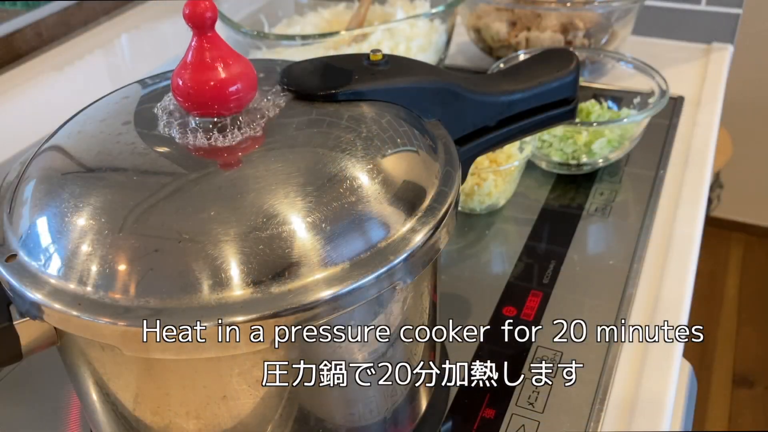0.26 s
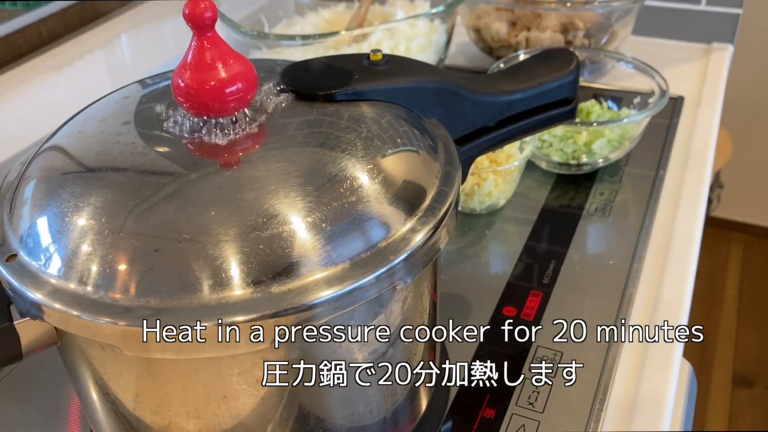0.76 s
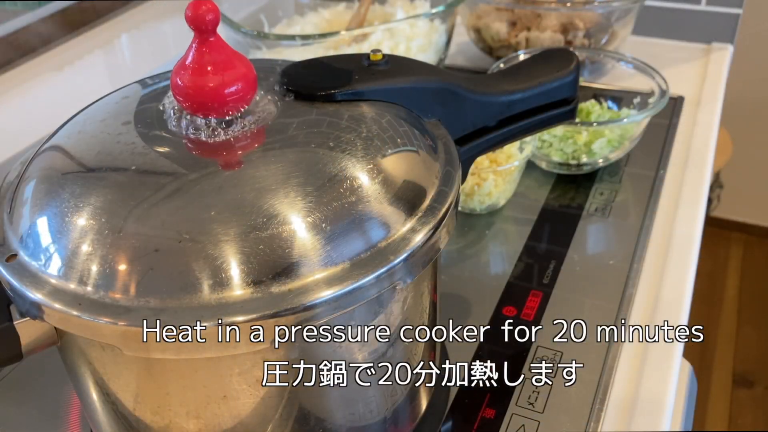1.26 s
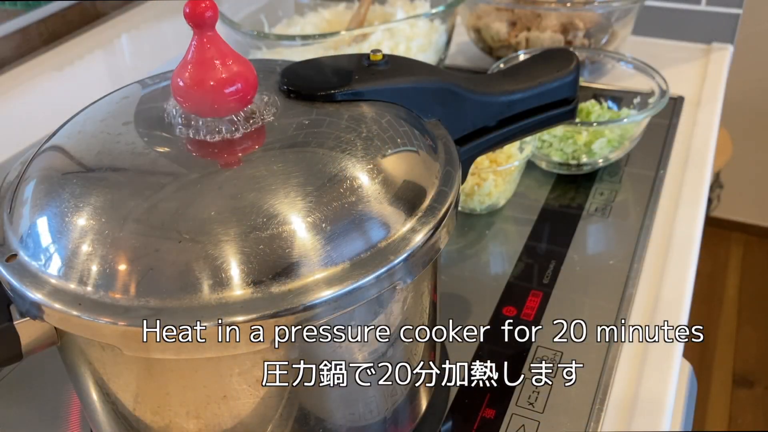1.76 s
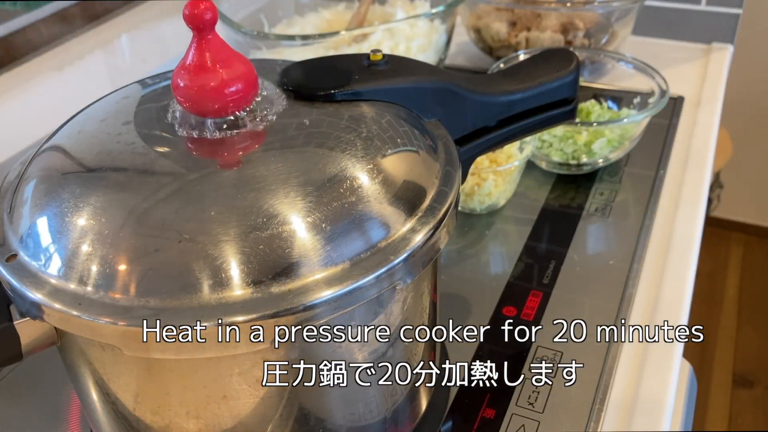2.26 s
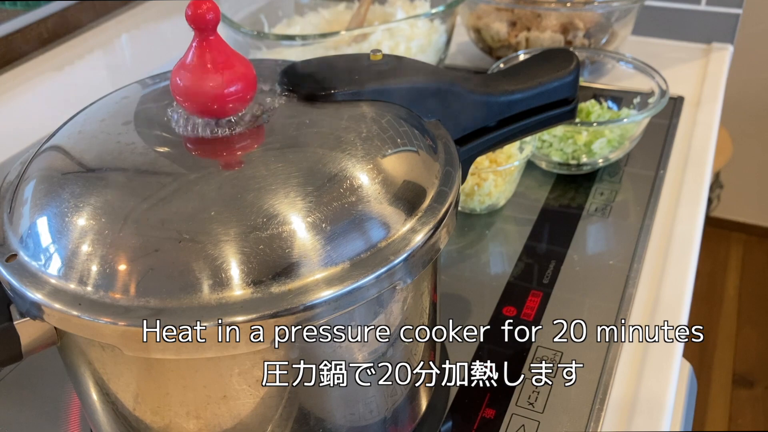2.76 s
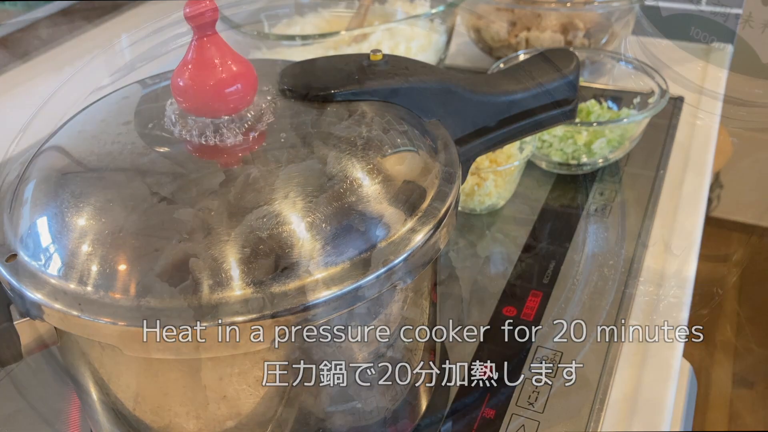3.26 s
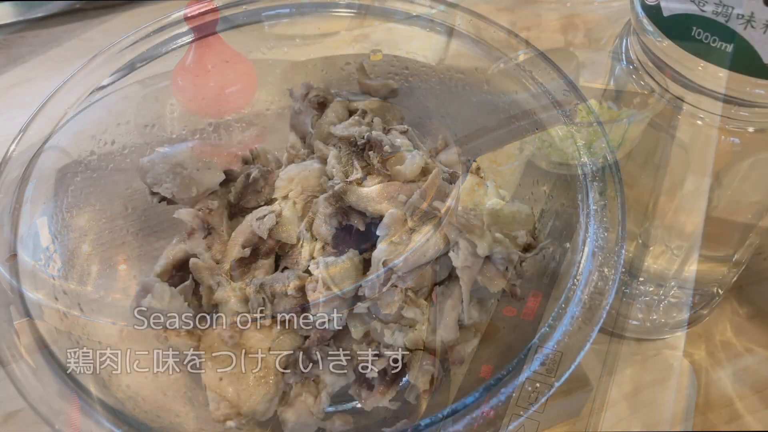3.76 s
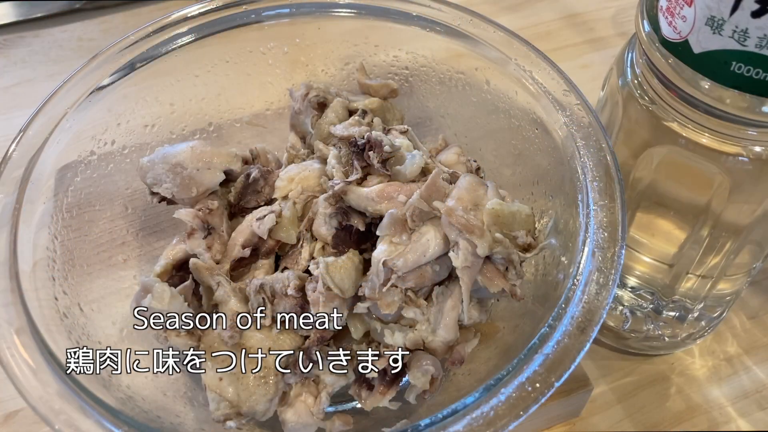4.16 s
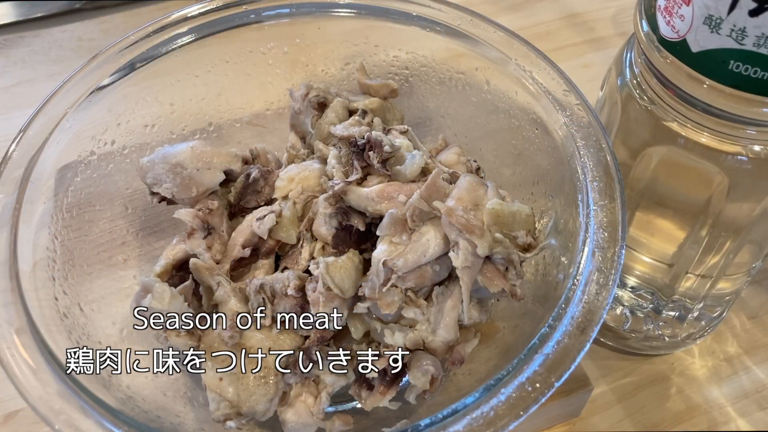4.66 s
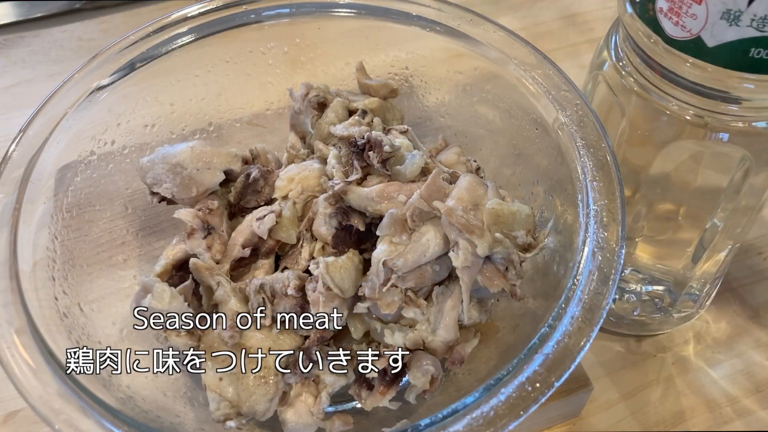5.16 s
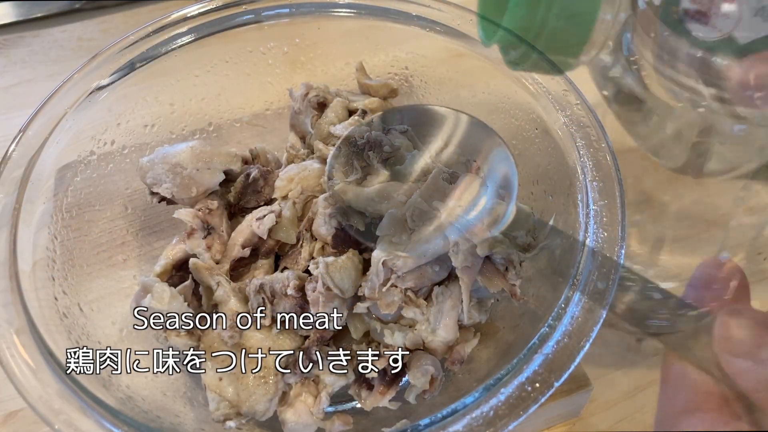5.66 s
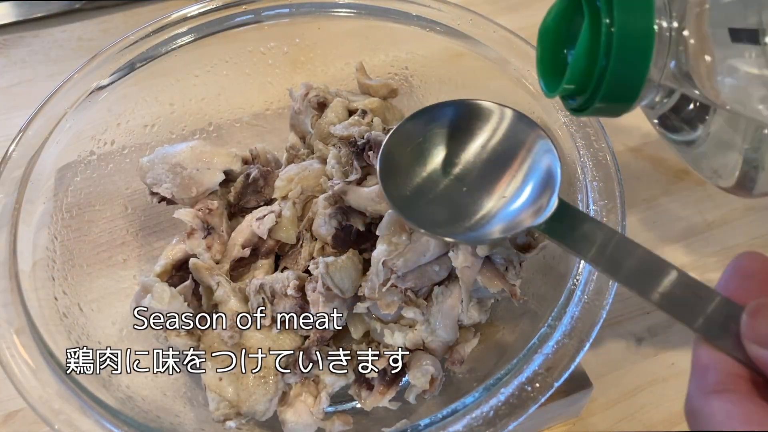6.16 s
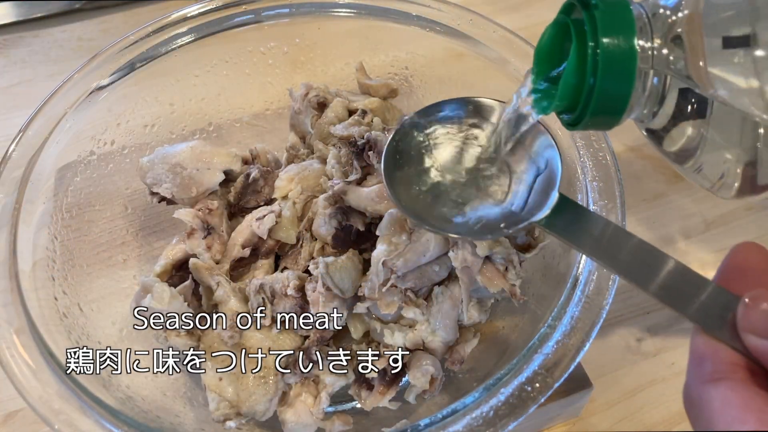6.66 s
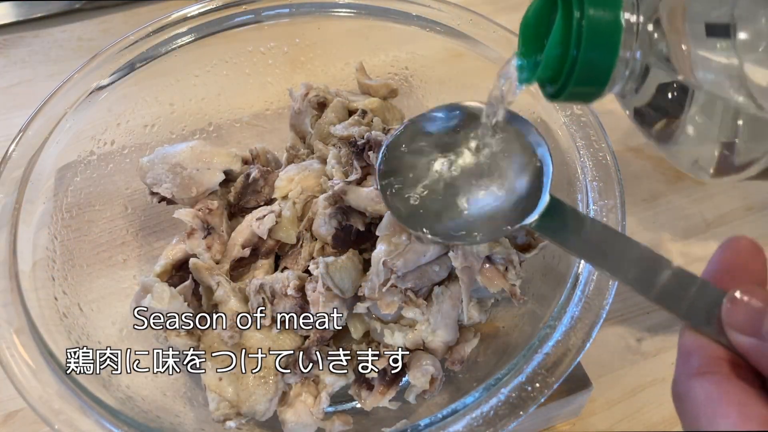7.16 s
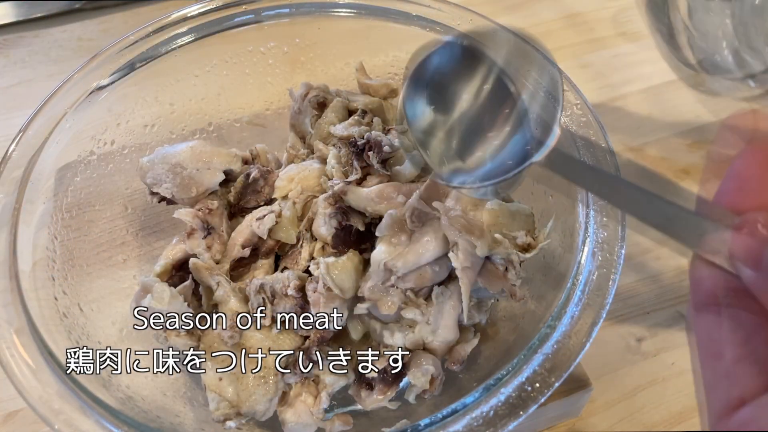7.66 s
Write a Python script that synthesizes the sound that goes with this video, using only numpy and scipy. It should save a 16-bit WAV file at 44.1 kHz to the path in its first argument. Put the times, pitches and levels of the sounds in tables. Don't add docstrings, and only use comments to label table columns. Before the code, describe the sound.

Close phone recording in stereo: rapid irregular steam spurts sputter from a pressure cooker, bright and metallic, over a low fan and fridge hum. After more than three seconds they dissolve into a calmer counter with a stronger hum. One hard plastic crack rings a bottle and thumps the counter, leaving a brief room tail and tiny ticks. Then a soft, bubbly pour ticks and spatters at low level.

```python
import sys
import numpy as np
from scipy import signal
from scipy.fft import rfft, irfft, next_fast_len
from scipy.io import wavfile
from scipy.ndimage import uniform_filter1d

SR = 44100
rng = np.random.default_rng(int(sys.argv[2]) if len(sys.argv) > 2 else 0)


def magnitude_from_level(level_db):
    exponent = np.asarray(level_db, float) / 20
    return 10 ** exponent


def master_out(mix):
    frames = np.transpose(np.atleast_2d(mix))
    ceiling = np.clip(frames, -1, 1)
    pcm = np.round(ceiling * 32767).astype(np.int16)
    wavfile.write(sys.argv[1], SR, pcm)


N = 349272
T = np.arange(N) / SR
SIZE = next_fast_len(N + SR)
HZ = np.maximum(np.arange(SIZE // 2 + 1) * SR / SIZE, 1.)

# [freq_hz, right_lead_rad, diffuse_likeness_0_1]
PORTS = [(20, 0, .55), (60, 0, .65), (120, 0, .9), (300, .05, .8), (600, .6, .3), (1000, 1.8, .45),
         (1400, 1.6, .3), (2400, 1.8, .3), (3000, 2.9, .25), (4200, 3.1, .3), (4900, 3.14, .75),
         (5500, 3.14, .9), (6200, 3.05, .85), (6650, 1.4, .6), (7100, .03, .995), (9600, -.03, .995),
         (10200, -.7, .75), (10800, -2.9, .8), (11500, -3.14, .9)]
# [start_s, end_s]
FADE_S = [3.2, 3.73]


def along(table, column=1):
    rows = np.array(table, float)
    return np.interp(np.log(HZ), np.log(rows[:, 0]), rows[:, column])


def shape(x, gain):
    return irfft(rfft(x, SIZE) * gain, SIZE)[..., :N]


def unit(x):
    return x / np.sqrt(np.mean(x ** 2))


def diffuse():
    alike = np.clip(along(PORTS, column=2), 0, 1)
    common, left, right = rng.standard_normal((3, N))
    return shape(common, np.sqrt(alike)) + shape(np.array([left, right]), np.sqrt(1 - alike))


def walk(rate_hz):
    k = int(SR / rate_hz)
    held = np.repeat(rng.standard_normal(N // k + 1), k)
    return unit(uniform_filter1d(held, k)[:N])


def ring(hz, gain, t60_s, glide=0.):
    t = np.arange(int(t60_s * SR)) / SR
    decay = np.exp(-np.log(1000) * t / t60_s)
    return gain * decay * np.sin(2 * np.pi * hz * t * (1 + glide * t / t60_s))


def add(out, s, piece):
    i = int(s * SR)
    out[i:i + len(piece)] += piece[:N - i]


def bursts(rows):
    out = np.zeros(N)
    for s, db, fall_s in rows:
        add(out, s, magnitude_from_level(db) * np.exp(-np.arange(int(10 * fall_s * SR)) / (fall_s * SR)))
    return out


def vent_opening():
    # [peak_s, jet_db, fall_s, wetness_db]
    puffs = [(0.012, -26, 0.014, 0), (0.08, -27.0, 0.029, 2), (0.157, -29.5, 0.015, 1),
             (0.23, -31.5, 0.024, 1), (0.329, -29, 0.023, 0), (0.405, -35.5, 0.025, 3.5),
             (0.469, -32.5, 0.017, -0.5), (0.631, -33, 0.023, 0), (0.698, -31.5, 0.025, -1.5),
             (0.791, -32, 0.025, -1.5), (1.14, -30.5, 0.024, -3), (1.581, -31.5, 0.049, 0.5),
             (1.648, -36.5, 0.03, 0.5), (1.737, -32.5, 0.03, 1.5), (1.89, -31.5, 0.031, 4),
             (1.906, -33.5, 0.012, 3.5), (1.983, -32, 0.026, 0.5), (2.058, -26, 0.016, -2),
             (2.204, -33.5, 0.02, 0), (2.47, -26, 0.02, -3.5), (2.545, -34, 0.033, 2.5),
             (2.628, -32.5, 0.029, -2.5), (2.782, -28, 0.024, 2.5), (2.859, -24.5, 0.018, -3),
             (2.929, -27.5, 0.026, -2.5), (3.145, -34, 0.026, 1.5), (3.29, -33, 0.022, -1.5)]
    # [peak_s, jet_db, fall_s, wetness_db]
    half_puffs = [(0.538, -34, 0.033, 2), (0.845, -36.5, 0.041, -2.5), (0.934, -41.5, 0.022, -3),
                  (0.983, -34, 0.024, -4), (1.082, -39, 0.029, -1), (1.244, -39, 0.04, -1.5),
                  (1.295, -32.5, 0.019, -4), (1.38, -40, 0.026, -0.5), (1.445, -35, 0.039, -1),
                  (1.552, -38, 0.015, 6), (1.802, -41.0, 0.055, 0), (2.141, -37, 0.033, 5.5),
                  (2.24, -43, 0.042, 0.5), (2.312, -35.5, 0.037, -1.5), (2.379, -37.5, 0.03, 3),
                  (2.691, -36.5, 0.032, -2), (2.998, -38, 0.035, 0.5), (3.086, -36.5, 0.019, 2),
                  (3.224, -36, 0.025, 1), (3.381, -37.5, 0.026, 0.5), (3.444, -33.5, 0.022, -1),
                  (3.521, -36.5, 0.021, -1.5), (3.594, -34.5, 0.022, 1), (3.69, -37.5, 0.021, 2.5),
                  (3.763, -39.0, 0.021, 4), (3.833, -47.5, 0.02, 2.5), (3.886, -54.5, 0.028, 4)]
    # [start_s, peak_db, fall_s]
    spurts = [(0.0498, -23, 0.012), (0.143, -16, 0.012), (0.2034, -34, 0.0071), (0.3202, -22, 0.012),
              (0.4569, -27, 0.014), (0.627, -20, 0.009), (0.6833, -23, 0.012), (0.9652, -29, 0.01),
              (1.1268, -32, 0.012), (1.29, -31, 0.011), (1.5199, -24, 0.012), (1.5427, -19, 0.013),
              (1.706, -20.5, 0.013), (1.9644, -33, 0.012), (2.0438, -28, 0.012), (2.0507, -31, 0.016),
              (2.197, -21.5, 0.013), (2.4616, -12.5, 0.016), (2.6189, -21, 0.012), (2.7531, -35, 0.012),
              (2.7621, -24, 0.012), (2.8419, -26, 0.012), (2.85, -18, 0.011), (2.9068, -13, 0.014),
              (3.0745, -23, 0.012), (3.271, -22, 0.011), (3.505, -26, 0.012), (3.673, -27, 0.013)]
    power = np.zeros((3, N))
    for s, db, fall_s, wet_db in list(puffs) + list(half_puffs):
        near = slice(max(int((s - .15) * SR), 0), int((s + .2) * SR))
        t = T[near] - s
        rise = 0.81 * (t / (1.075 * fall_s)) ** 2
        fall = 0.78 * (np.abs(t) / fall_s) ** 1.42
        bump = np.exp(-np.where(t < 0, rise, fall))
        parts_db = db + np.array([0, -7 + 0.86 * wet_db, -16 + 1.14 * wet_db])
        power[:, near] += (magnitude_from_level(parts_db)[:, None] * bump) ** 2
    leak = magnitude_from_level(-55.5 + np.array([[0], [2.5], [-1.5]])) * np.interp(T, FADE_S, [1, 0])
    spurt = bursts(spurts) * magnitude_from_level(-14 + np.array([[0], [-8], [-18]]))
    return np.sqrt(power + leak ** 2 + spurt ** 2)


def steam():
    # [freq_hz, level_db_per_hz]
    spectrum = [(600, -82.5), (1000, -84), (1500, -83.5), (2000, -82.5), (2400, -79), (3000, -78),
                (4000, -80.5), (5000, -80.5), (6000, -72.5), (7500, -75), (8700, -72), (10000, -75.5),
                (11300, -72.5), (11900, -96.5)]
    # [freq_hz, width_hz, gain_db]
    modes = [(2415, 57, 10), (2580, 78, 2.5), (2874, 50, 10.5), (3490, 20, 10), (3650, 22, 13),
             (4516, 77, 13), (4880, 60, 15.5), (6210, 33, -1), (7400, 120, -2.5)]
    # [freq_hz, left_minus_right_db, left_lead_rad]
    lid_side = [(503, 5.5, -1), (1030, -2.5, -0.5), (1520, -2.5, 3), (2650, -8, 3), (3090, 0, -0.38),
                (4203, 1.5, 2), (4640, 0, 0), (12000, 0, 0)]
    edges_hz = [0, 6600, 7800, 9000, 10200, 23000]
    flutter_db, flutter_hz = 2, 45
    lid = 1 + sum((magnitude_from_level(db) - 1) / (1 + (2 * (HZ - hz) / width_hz) ** 2) for hz, width_hz, db in modes)
    half = np.array([[.5], [-.5]])
    apart = magnitude_from_level(along(lid_side) * half) * np.exp(1j * along(lid_side, column=2) * half)
    colour = magnitude_from_level(along(spectrum)) * lid * apart / (1 + (600 / HZ) ** 3)
    low = 1 / (1 + (HZ / 2200) ** 8)
    high = 1 / (1 + (4500 / HZ) ** 8)
    out = 0
    for gate, band, sputter_db in zip(vent_opening(), (high, 1 - low - high, low), (1.6, 2.6, 2.1)):
        sputter = magnitude_from_level(sputter_db * walk(260) + 0.19 * walk(60))
        steady = shape(diffuse() * sputter, colour * band)
        if band is high:
            steady = sum(shape(steady, (HZ >= lo) & (HZ < hi)) * magnitude_from_level(flutter_db * walk(flutter_hz))
                         for lo, hi in zip(edges_hz, edges_hz[1:]))
        out = out + unit(steady) * gate
    return out


def weight_knocks():
    # [start_s, peak_db]
    knocks = [(0.141, -46), (0.431, -36), (0.768, -43), (1.523, -33.5), (1.967, -35), (2.037, -27),
              (2.127, -28), (2.459, -55), (2.758, -64), (2.921, -33.5), (3.501, -57), (3.672, -42)]
    level = bursts([(s, db - 2.0, .003) for s, db in knocks])
    dull = 1 / (1 + (900 / HZ) ** 4) / (1 + (HZ / 3500) ** 3)
    return unit(shape(diffuse(), dull)) * level * magnitude_from_level([[-2.5], [2.5]])


def cooker():
    return steam() + weight_knocks()


def snap():
    # [start_s, level_db, fall_s]
    strikes = [
        (4.701, -22, 0.005),
        (4.7055, -12, 0.002),
        (4.7085, 3.5, 0.0015),
        (4.71, -7, 0.0014),
        (4.7125, -19, 0.0038),
    ]
    # [start_s, level_db]
    settle = [
        (4.745, -48),
        (4.874, -33.5),
        (5.064, -43),
        (5.145, -47),
        (5.365, -42),
    ]
    # [freq_hz, level_db_per_hz]
    crack_colour = [(60, -68), (200, -31), (600, -51), (1400, -52), (2200, -46), (2800, -38), (3500, -65),
                    (5300, -48.5), (6300, -73), (7800, -54.5), (8800, -67), (10600, -48.5), (11900, -60.5)]
    # [freq_hz, level_db_per_hz]
    tail_colour = [(60, -77), (200, -59.5), (400, -68), (1000, -83.5), (2200, -68), (3500, -74.5),
                   (4400, -74.5), (5300, -78), (6300, -83), (7800, -82.5), (10600, -87.5), (11900, -140.0)]
    # [freq_hz, level_db, t60_s]
    bottle = [(224, -28.5, 0.17), (411, -32.5, 0.2), (726, -29.5, 0.13), (52, -42, 0.34),
              (1000, -24, 0.027), (1400, -14.5, 0.042), (2236, -26, 0.25), (2490, -35, 0.049),
              (2700, -26, 0.1), (2980, -39, 0.17), (4280, -29, .3), (5250, -54, .3), (5260, -39, .3)]
    hits = bursts(strikes + [(s, db, .004) for s, db in settle])
    noise = 0.64 * rng.standard_normal(N) + 0.51 * diffuse()
    crack = shape(noise * hits, magnitude_from_level(along(crack_colour) + 48.5) / (1 + (700 / HZ) ** 3))
    body = np.zeros(N)
    for hz, db, t60_s in bottle:
        add(body, 4.7085 + 0.85 / hz, ring(hz, magnitude_from_level(db), t60_s))
    add(body, 4.7143, -ring(208, magnitude_from_level(-17), 0.054))
    add(body, 4.7455, ring(2260, magnitude_from_level(-31), .06))
    fading = bursts([(4.712, -2, 0.017), (4.712, -6, 0.12)])
    tail = shape(diffuse() * fading * magnitude_from_level(2.6 * walk(60)), magnitude_from_level(along(tail_colour) + 50.5))
    return (crack + body) * magnitude_from_level([[-1.5], [1.5]]) + tail


def pour():
    # [start_s, peak_db, pitch_hz, length_cycles, crack_db]
    drops = [(6.6267, -42.5, 2140, 6.1, -65), (6.8523, -39.5, 5030, 2.8, -69.5),
             (6.9347, -41.5, 4040, 14, -34.5), (7.0066, -40, 8100, 5, -52), (7.108, -49, 2830, 8, -53),
             (7.1966, -46, 5170, 5, -41), (7.2098, -40, 7000, 12, -57), (7.231, -32.5, 2380, 6.8, -28.5),
             (7.2876, -48, 2000, 10, -76), (7.3225, -42, 10000, 8, -65), (7.3376, -53, 5200, 5, -34),
             (7.3417, -35, 8600, 7.7, -36), (7.348, -40, 6000, 9.9, -37), (7.353, -50, 5400, 10, -56),
             (7.386, -36, 5230, 23, -27.5), (7.398, -38, 5400, 11, -46), (7.439, -33, 6270, 8.8, -55),
             (7.473, -37.5, 7140, 14, -52), (7.492, -47, 5100, 9.9, -50), (7.493, -39.5, 2700, 8.4, -55),
             (7.5, -44, 4300, 8.3, -44), (7.527, -43, 8510, 20, -48), (7.563, -36, 10100, 8, -58),
             (7.53, -38, 2530, 4, -56), (7.477, -44, 3230, 8.8, -60), (7.418, -52, 9600, 6, -41),
             (7.752, -47, 7850, 11, -77)]
    # [time_s, level_db]
    trickle = [(6.4, -68), (6.801, -73), (7.2, -65.5), (7.32, -66), (7.35, -64.5), (7.39, -56.5),
               (7.45, -51.5), (7.5, -55.5), (7.54, -63), (7.62, -60.5), (7.92, -89)]
    bubbles = np.zeros(N)
    for s, db, hz, cycles, _ in drops:
        add(bubbles, s, ring(hz, magnitude_from_level(db - 3.5), 7.7 * cycles / hz, glide=0.044))
    cracks = bursts([(s, crack_db - 5.0, .0012) for s, *_, crack_db in drops])
    flow_s, flow_db = np.transpose(trickle)
    for when, pitch, size in rng.random((700, 3)):
        at_s = 6.4 + 1.5 * when
        hz = 1800 * 6.1 ** pitch
        gain = magnitude_from_level(np.interp(at_s, flow_s, flow_db) + 9.7 * size ** 2)
        add(bubbles, at_s, ring(hz, gain, 18 / hz, glide=0.21))
    flow = np.interp(T, flow_s, flow_db, left=-120) + 52.0
    spatter = magnitude_from_level(-50 + 1.1 * flow + 4.0 * walk(150))
    lead_rad = np.interp(HZ, [1490, 2330, 4400, 5100], [-0.5, 4.0, 2.0, 0.5])
    apart = np.exp(1j * lead_rad * np.array([[.5], [-.5]]))
    splash = shape(diffuse() * (cracks + spatter), 1 / (1 + (1200 / HZ) ** 4))
    return shape(bubbles * magnitude_from_level([[-.4], [.4]]), apart) + splash


def room_air(room_db):
    # [freq_hz, level_db_per_hz]
    air = [(25, -96), (50, -77.5), (100, -76), (200, -78.5), (400, -82), (600, -85.5), (1000, -85),
           (1300, -90.5), (2000, -89), (2600, -96), (4000, -100.0), (6000, -105.0), (9000, -105.0),
           (11000, -106.0), (11900, -114.0)]
    # [time_s, level_db]
    hiss_sag = [
        (5.05, 0.5),
        (5.11, -11),
        (5.2, -4),
        (5.23, -0.5),
    ]
    rumble = 1 / (1 + (HZ / 1800) ** 4)
    colour = magnitude_from_level(along(air)) * np.sqrt(SR / 2)
    lows = shape(diffuse(), colour * rumble) * magnitude_from_level(room_db + 51.5 + 0.24 * walk(7.6))
    sag_db = np.interp(T, *np.transpose(hiss_sag))
    hiss = shape(diffuse(), colour * (1 - rumble)) * magnitude_from_level(0.5 * walk(2.2) + sag_db)
    return lows * magnitude_from_level([[.8], [-.8]]) + hiss


def motor_hum(room_db):
    # [start_s, end_s]
    fridge_up_s = [2.66, 3.4]
    # [freq_hz, level_db]
    lines = [(140, -61.5), (222, -61), (360, -67), (441, -65), (478, -67), (600, -67), (721, -64.5),
             (840, -66.5), (958, -68), (1077, -71), (1916, -75)]
    near = np.interp(T, FADE_S, [0, 1])
    throb = np.sin(np.pi * 3.105 * (T - 1.08)) ** 2
    fan_db = -57 - 17 * throb + 0.6 * walk(1.7)
    hum = magnitude_from_level(fan_db) * np.sin(2 * np.pi * 68.6 * T + 0.46 * walk(2.0))
    fridge_db = np.interp(T, fridge_up_s, [-62, -56]) + 0.49 * near * (room_db + 58.5) + 1.0 * walk(7)
    hum += magnitude_from_level(fridge_db) * np.sin(2 * np.pi * 120.2 * T + 0.16 * walk(4.2))
    hob_db = -65.5 - 1.9 * near + 1.2 * walk(2.37)
    hum += magnitude_from_level(hob_db) * np.sin(2 * np.pi * 205 * T + 0.35 * walk(7.6))
    for hz, db in lines:
        hum += near ** 2 * magnitude_from_level(db + 2.2 * walk(8)) * np.sin(2 * np.pi * hz * T + hz / 1800 * walk(12))
    return hum * magnitude_from_level([[.6], [-.6]])


def kitchen():
    # [time_s, level_db]
    room = [(0, -54), (.3, -57.5), (1.7, -56), (2.5, -53.5), (3.5, -55), (3.95, -50), (4.6, -49.5),
            (4.9, -50), (5.2, -48), (5.55, -53.5), (6.1, -49.5), (7.3, -51), (7.48, -50), (7.92, -54.5)]
    room_db = np.interp(T, *np.transpose(room))
    return room_air(room_db) + motor_hum(room_db)


def scene():
    return cooker() + snap() + pour() + kitchen()


def thin(x):
    # [freq_hz, level_db]
    mask = [(1000, -18), (2400, -8), (3600, -5), (4500, -8), (4950, -2), (5400, -2), (5900, -6),
            (6600, -3.5), (7200, -9), (9300, -9), (10200, -3), (11000, -1), (11700, 1)]
    sharp_s = [.02, .14, .185, .205, .254, .67, .764, 2.04, 2.065, 2.135, 2.3, 2.76, 2.83, 3.06, 3.13, 3.34,
               3.365, 3.665, 3.715, 4.71, 4.735, 5.22, 6.94, 7.01, 7.1, 7.125, 7.2, 7.225, 7.335, 7.36,
               7.39, 7.41, 7.495, 7.52, 7.545, 7.91]
    band_bins, lead = 10, 94
    window = signal.windows.kaiser_bessel_derived(2048, 4 * np.pi)
    mid_side = np.pad(np.array([x[0] + x[1], x[0] - x[1]]) / 2, ((0, 0), (lead, 0)))
    hz, _, z = signal.stft(mid_side, SR, window, nperseg=2048)
    power = np.add.reduceat(np.abs(z) ** 2, np.arange(0, len(hz), band_bins), axis=1)
    sharp = np.isin(np.arange(z.shape[2]), np.round((np.array(sharp_s) * SR + lead) / 1024))
    waver = uniform_filter1d(rng.standard_normal(power.shape), size=2, axis=2)
    waver = np.sqrt(6) * uniform_filter1d(waver, size=3, axis=1)
    mask_db = np.interp(hz[::band_bins], *np.transpose(mask))[:, None] - 22 * sharp + 4.5 * waver
    kept = power > power.sum(0) * magnitude_from_level(mask_db) ** 2
    z = z * kept[:, np.arange(len(hz)) // band_bins]
    mid, side = signal.istft(z, SR, window, nperseg=2048)[1][:, lead:lead + N]
    return np.array([mid + side, mid - side])


def top_cut(x):
    return signal.sosfilt(signal.butter(12, 12000, fs=SR, output="sos"), x)


def record(dry):
    turn = np.exp(1j * along(PORTS) * np.array([[-.5], [.5]]))
    turn = turn / (1 + (38 / HZ) ** 4) / (1 + (HZ / 11900) ** 80)
    top = 1.1
    rounded = top * np.tanh(shape(dry, turn) / top)
    mix = thin(shape(rounded, 1 / (1 + (HZ / 12000) ** 80)))
    return top_cut(mix)


dry = scene()
out = record(dry)
master_out(out)
```